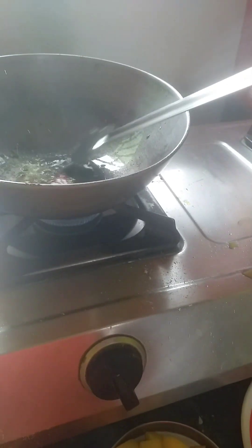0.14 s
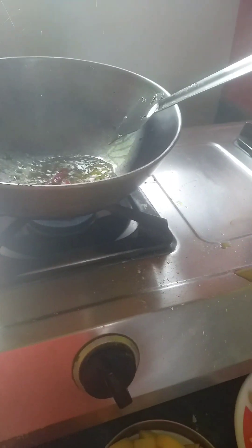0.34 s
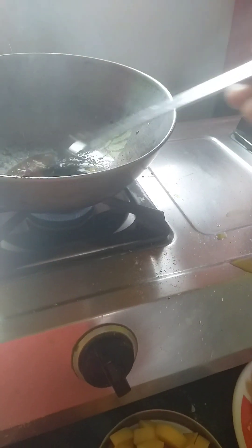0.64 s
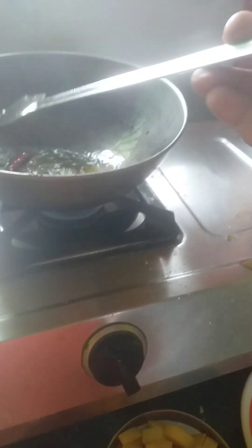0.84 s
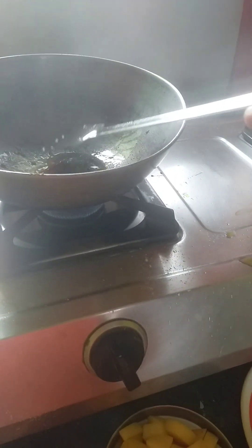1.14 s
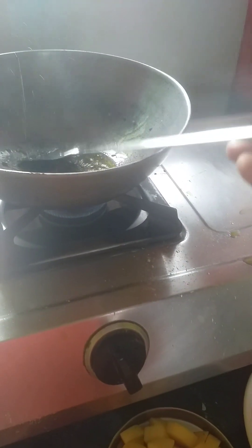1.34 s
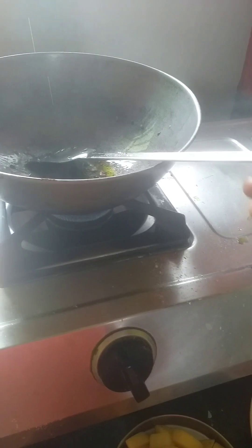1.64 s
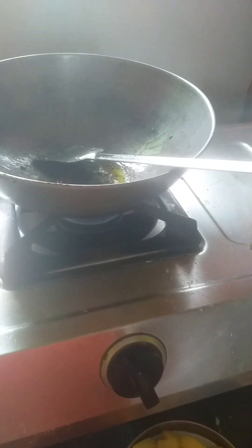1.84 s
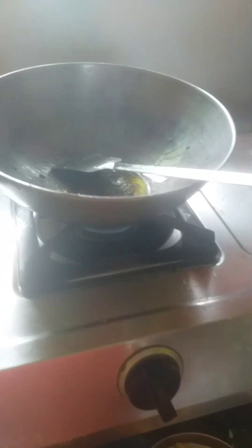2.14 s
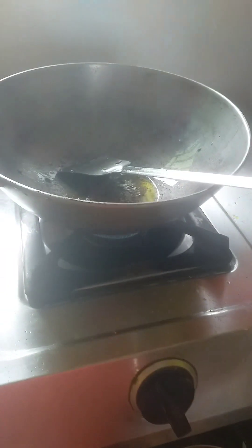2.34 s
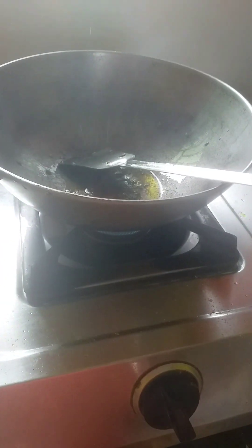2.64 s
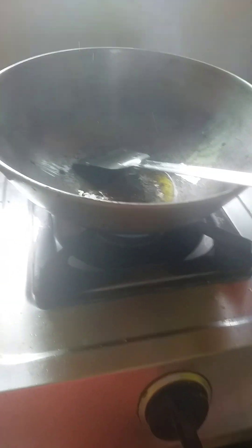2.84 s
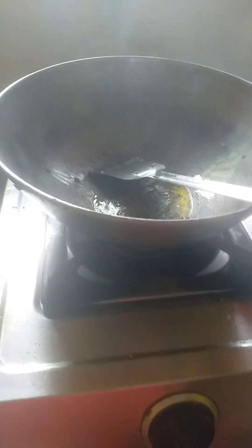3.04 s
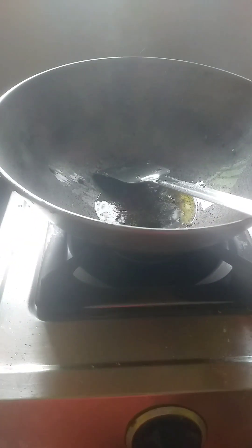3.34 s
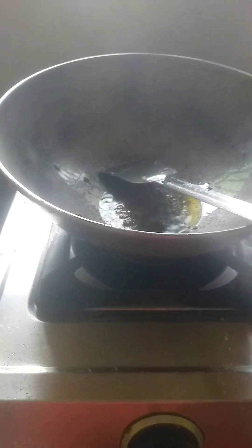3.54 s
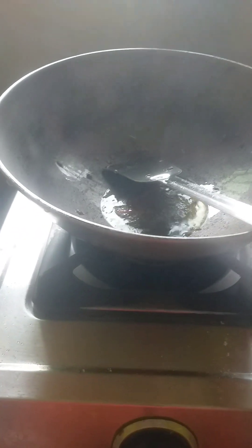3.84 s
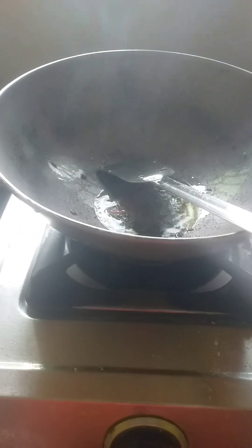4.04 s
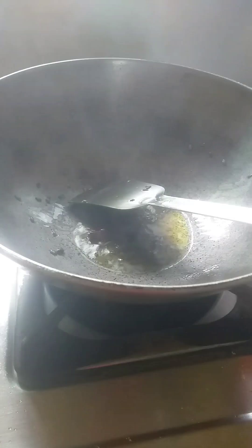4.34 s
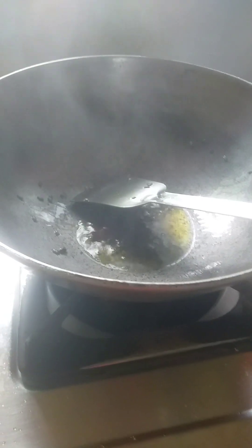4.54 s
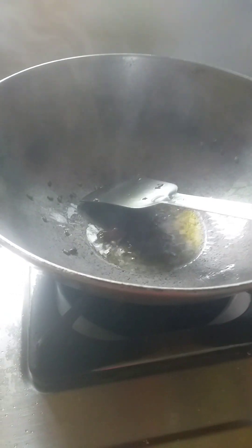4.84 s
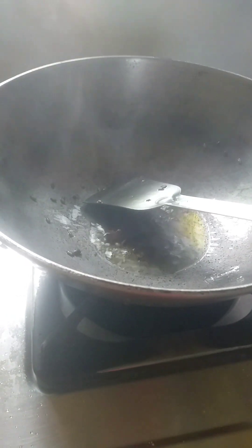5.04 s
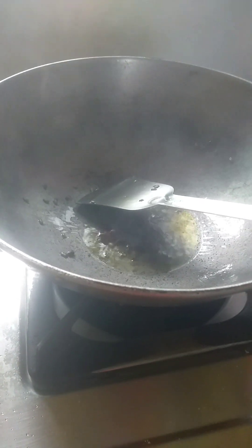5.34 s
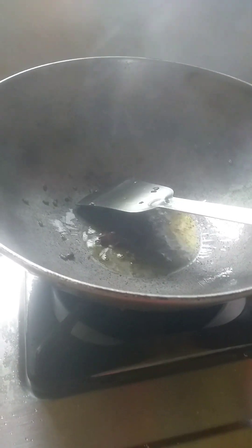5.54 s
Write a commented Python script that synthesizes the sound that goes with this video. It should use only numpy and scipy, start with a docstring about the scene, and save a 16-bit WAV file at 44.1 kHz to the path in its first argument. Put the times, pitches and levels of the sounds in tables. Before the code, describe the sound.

Seeds and dried chilli pop and spit rapidly in hot oil in a deep metal pan, thinning out to quiet fizz and burner hum.

```python
"""Bursting seeds and chilli pop in hot oil in a deep steel pan, close to a phone in a small hard kitchen. Each
pop layers a bubble's short ping, a thud, a crack and a spit of treble, thrown back by pan and walls. Noise
bands make the oil's fizz and the burner's roar; deep thuds under some pops, soft knocks and one faint tone sit
among them. Near the end the sound drops out for an instant; then come a faint creak, a dying ring and a few
weak pops over fizz and burner."""
import sys
import numpy as np
from scipy import signal
from scipy.fft import rfft, irfft
from scipy.io import wavfile
from scipy.ndimage import uniform_filter1d

SR = 44100
rng = np.random.default_rng(int(sys.argv[2]) if len(sys.argv) > 2 else 0)


def wav_record(signal):
    """Record a signal, one row per channel, as 16-bit PCM in the file named by sys.argv[1]."""
    frames = np.transpose(np.atleast_2d(signal))
    bounded = np.clip(frames, -1, 1)
    # unit amplitude maps onto the largest positive 16-bit level
    quanta = np.round(bounded * 32767).astype(np.int16)
    wavfile.write(sys.argv[1], SR, quanta)


N = 251370
DROPOUT_START_S, DROPOUT_END_S = 4.333, 4.346


def undb(db):
    """Decibels to amplitude."""
    return 10 ** (np.asarray(db) / 20)


def unit(x):
    """Scale to an RMS of 1."""
    return x / np.sqrt(np.mean(x ** 2))


def noise():
    """White noise as long as the scene."""
    return rng.standard_normal(N)


def band(x, hz, width):
    """Steep band-pass around hz."""
    edges = [max(hz - width / 2, 20), min(hz + width / 2, .45 * SR)]
    return signal.sosfilt(signal.butter(3, edges, "bandpass", fs=SR, output="sos"), x)


def click_band(hz, width):
    """A one-sample click heard through a band; energy 1."""
    click = (np.arange(1200) == 0) * 1.
    heard = band(click, hz, width)
    return heard / np.linalg.norm(heard)


def curve(table):
    """Columns of a timed table, one value a sample."""
    s, *columns = np.transpose(table)
    return [np.interp(np.arange(N) / SR, s, c) for c in columns]


def walk(rate):
    """Random levels held for 1 / rate seconds and slewed; spread near 1."""
    hold = int(SR / rate)
    steps = np.repeat(rng.standard_normal(N // hold + 1), hold)
    return 1.2 * uniform_filter1d(steps, hold)[:N]


def add(out, s, grain):
    """Mix a grain in at s seconds, cut at the end of the scene."""
    i = int(s * SR)
    out[i:i + len(grain)] += grain[:N - i]


# fizz of the oil; air is the top treble: start_s, level_db, air_level_db (against level_db)
OIL_FIZZ = [(0, -41, -21), (.7, -46.5, -10), (1.4, -44.5, -18), (2.4, -49, -13), (3.4, -59, -12),
            (4.3, -54, -9.5), (4.6, -63, -13), (4.85, -63, -12), (5.0, -63.5, -17), (5.7, -63.5, -16.5)]
# the 3.7-5 kHz hiss stays low, then swells once: start_s, gain_db
HISS_SWELL = [(4.5, -14), (4.85, -8), (5.0, 1), (5.3, 9), (5.58, 4), (5.7, -8)]
HISS_DB = -8  # hiss against the fizz level, before its swell


def fizz():
    """Countless tiny bubbles merge into hiss; its bands flicker a little."""
    level_db, air_db = curve(OIL_FIZZ)
    body = np.zeros(N)
    # pitch_hz, width_hz, level_db
    for hz, width, db in [(5400, 300, -11.5), (6850, 1770, -6), (7960, 830, -12), (3360, 3050, -17)]:
        body += undb(db + 1.0 * walk(13)) * unit(band(noise(), hz, width))
    hiss_db = HISS_DB + curve(HISS_SWELL)[0] + 0.74 * walk(32)
    hiss = unit(band(noise(), 4350, 1290)) * undb(hiss_db)
    air = unit(band(noise(), 12600, 7800)) * undb(air_db + 0.46 * walk(6.6))
    return undb(level_db) * (body + hiss + air)


# tone of the burner roar, shape only: pitch_hz, relative_level_db (per Hz)
BURNER_TONE = [(18, -69), (30, -5.5), (92, -2), (154, -5), (198, -4.5), (223, -16.5), (303, -5),
               (428, -16.5), (926, -20.5), (1060, -28.5), (1360, -20.5), (2040, -37), (3000, -22.5),
               (3900, -31), (6600, -120)]
# loudness of the roar: start_s, level_db
BURNER_LEVEL = [(0, -66.5), (1.0, -68), (1.7, -66), (2.3, -65), (3, -67.5), (4.3, -65), (4.7, -70.5),
                (5.7, -68.5)]


def burner():
    """Low roar of the gas flame and the kitchen's hum: noise shaped by a spectrum, wavering in level."""
    hz = np.maximum(np.arange(N // 2 + 1) * SR / N, 1)
    tone_hz, tone_db = np.transpose(BURNER_TONE)
    shape_db = np.interp(np.log(hz), np.log(tone_hz), tone_db)
    roar = irfft(rfft(noise()) * undb(shape_db), N)
    return unit(roar) * undb(curve(BURNER_LEVEL)[0] + 0.68 * walk(18))


def ping(hz, cycles, glide):
    """A bubble rings, dying over a few cycles, its pitch rising by any glide; energy 1."""
    turns = np.arange(int(7 * cycles / hz * SR)) * hz / SR
    tone = np.sin(2 * np.pi * turns * (1 + glide * turns / cycles))
    attack = 1 - np.exp(-(turns / 2.1) ** 2)
    y = tone * np.exp(-turns / cycles) * attack
    return y / np.linalg.norm(y)


# bands of a pop, in order thud, three of crack, spit: pitch_hz, width_hz
POP_BANDS = [(700, 645), (2350, 1215), (4000, 1840), (6600, 2520), (12600, 5100)]
# thud of every pop, fading as the oil calms: start_s, level_db (against the ping)
POP_THUD = [(0, -20), (1.5, -25.5), (3, -34.5), (4.5, -41)]
CRACK_FALL_DB = 21.5  # loss from one end of the brightness range to the other


def pops(rows):
    """A ping, a thud, the crack of the husk and a spit of treble for every bursting seed."""
    out = np.zeros(N)
    clicks = [click_band(hz, width) for hz, width in POP_BANDS]
    for s, ping_db, hz, crack_db, bright, spit_db in rows:
        add(out, s, undb(ping_db) * ping(hz, cycles=2.97, glide=0.0046))
        thud_db = np.interp(s, *np.transpose(POP_THUD))
        # the crack is loudest in the band nearest its brightness
        crack = crack_db - CRACK_FALL_DB * (np.arange(3) / 2 - bright) ** 2
        parts_db = [thud_db, *crack, spit_db]
        add(out, s, sum(undb(ping_db + db) * click for db, click in zip(parts_db, clicks)))
    return out


SMALL_POPS, SMALL_END_S = 160, 4.5
SMALL_DB, SMALL_FADE_DB_PER_S, SMALL_SPREAD_DB = -27.5, 6.5, 2.5


def small_pops():
    """Rows for the many little bursts between the loud ones, weaker as time goes on."""
    u = rng.random((SMALL_POPS, 5))
    s = SMALL_END_S * u[:, 0] ** 1.2
    ping_db = SMALL_DB - SMALL_FADE_DB_PER_S * s - SMALL_SPREAD_DB * np.log(u[:, 1])
    hz = 2500 * 2.6 ** u[:, 2]
    crack_db, bright, spit_db = 0 * s, u[:, 3], -2.5 - 12 * u[:, 4]
    return list(zip(s, ping_db, hz, crack_db, bright, spit_db))


def rings(modes, t):
    """Decaying modes after a blow at t = 0."""
    return sum(undb(db - 60 * t / t60) * np.sin(2 * np.pi * hz * t) for hz, db, t60 in modes)


# early echoes: delay_s (varied a little), level_db (before echo_db), smear_s
EARLY_ECHOES = [(.0062, 2, 0.00099), (.012, -4, 0.002), (0.017, -5, 0.0043)]
# decay of the room by band: pitch_hz, t60_s
ROOM_DECAY = [(700, 0.33), (1800, 0.25), (3000, 0.22), (5000, 0.25), (7500, 0.26), (13000, 0.22)]
# ringing modes of the pan: pitch_hz, level_db (against the tail), t60_s
PAN_MODES = [(764, -18, 0.19), (1735, -36, 0.04), (1860, -42, 0.34), (3480, -25, 0.097),
             (5830, -18.5, 0.34), (6650, -13, 0.144), (7180, -19, .2), (13300, -21.5, 0.145),
             (13300, -16, .2), (14450, -17.5, .13)]


def kitchen(x, tail_db, echo_db):
    """Direct sound and echoes smeared by the curved pan, its ring, then a tail that dies by band."""
    t = np.arange(SR // 2) / SR
    splits = [np.sqrt(a[0] * b[0]) for a, b in zip(ROOM_DECAY, ROOM_DECAY[1:])]
    edges = [0] + splits + [SR / 2]
    f = np.arange(len(t) // 2 + 1) * SR / len(t)
    spectrum = rfft(rng.standard_normal(len(t)))
    tail = np.zeros(len(t))
    for lo, hi, (_, t60) in zip(edges, edges[1:], ROOM_DECAY):
        tail += irfft(spectrum * (f >= lo) * (f < hi), len(t)) * undb(-60 * t / t60)
    onset = 1 - np.exp(-(t / 0.00089) ** 2)
    room = undb(tail_db) * (tail * onset + rings(PAN_MODES, t))
    direct = [(0, 0.0026, 0.00082)]  # delay_s, level_db, smear_s
    echoes = [(s, db + echo_db, smear) for s, db, smear in EARLY_ECHOES]
    for s, db, smear in direct + echoes:
        cluster = rng.standard_normal(600) * np.exp(-t[:600] / smear)
        delay = s * (1 + 0.026 * rng.standard_normal())
        add(room, delay, undb(db) * cluster / np.linalg.norm(cluster))
    return signal.fftconvolve(x, room)[:N]


# deep thuds that go with some pops: start_s, level_db (of the body)
DEEP_THUDS = [(.144, -35.5), (.201, -39.5), (.4322, -40), (.5594, -37.5), (.625, -28.5), (.7929, -38),
              (.902, -44), (.9347, -34), (.9681, -32), (1.342, -26), (1.3925, -26.5), (1.4276, -34),
              (2.4263, -42), (2.4893, -44), (2.5799, -41), (2.6075, -44.5), (2.729, -49), (2.8702, -45),
              (4.0057, -49), (4.2146, -48)]
THUD_BODY_HZ, THUD_EDGE_HZ = 767, 1500  # hollow body and brighter edge


def deep_thuds():
    """Deep thuds that go with some pops: a click in a body band and an edge band."""
    out = np.zeros(N)
    thump = click_band(THUD_BODY_HZ, 380) + undb(-3.5) * click_band(THUD_EDGE_HZ, 450)
    for s, db in DEEP_THUDS:
        add(out, s, undb(db) * thump)
    return out


# dull knocks on the stove top: start_s, level_db (before the mode levels)
STOVE_KNOCKS = [(0.26, -58), (0.955, -55.5), (1.071, -50.5), (1.34, -48.5), (1.401, -43.5), (1.537, -48.5),
                (2.297, -56.5), (2.683, -54), (2.88, -67), (3.625, -66)]
# modes of the stove top, varied at each knock: pitch_hz, level_db, t60_s
STOVE_MODES = [(162, -5.5, 0.24), (287, -8, 0.42), (369, -3.5, 0.15), (455, 6, 0.041)]


def knocks():
    """Soft blows ring the stove top, each exciting its modes a little differently."""
    out, t = np.zeros(N), np.arange(SR // 2) / SR
    chances = rng.standard_normal((len(STOVE_KNOCKS), len(STOVE_MODES)))
    soft_attack = 1 - np.exp(-t / 0.0026)
    for (s, db), chance in zip(STOVE_KNOCKS, chances):
        modes = [(hz, d + 1.6 * c, t60) for (hz, d, t60), c in zip(STOVE_MODES, chance)]
        add(out, s, undb(db) * rings(modes, t) * soft_attack)
    return out


HOOT_START_S, HOOT_LENGTH_S, HOOT_HZ, HOOT_DB = 2.24, .06, 620, -62


def hoot():
    """One faint, brief sine tone with rounded ends."""
    out, t = np.zeros(N), np.arange(int(HOOT_LENGTH_S * SR)) / SR
    envelope = np.sqrt(np.sin(np.pi * t / HOOT_LENGTH_S))
    add(out, HOOT_START_S, undb(HOOT_DB) * np.sin(2 * np.pi * HOOT_HZ * t) * envelope)
    return out


# faint ringing after the dropout: pitch_hz, level_db (before swell and decay), t60_s
LATE_RING = [(509, -70.5, 1.0), (2640, -54, 0.44), (3530, -49, .3)]
RING_SWELL_S = 0.049


def after_ring():
    """Rough noise bands that swell and die away once the sound is back."""
    t = np.maximum(np.arange(N) / SR - DROPOUT_END_S, 0)
    swell = 1 - np.exp(-(t / RING_SWELL_S) ** 2)
    out = np.zeros(N)
    for hz, db, t60 in LATE_RING:
        out += undb(db - 60 * t / t60) * swell * unit(band(noise(), hz, hz / 12))
    return out


# creak ticks: start_s, level_db (energy), pitch_hz
CREAK_TICKS = [(4.502, -37, 1740), (4.556, -38.5, 1600), (4.611, -23.5, 1620), (4.644, -24.5, 1600),
               (4.652, -26, 1340), (4.666, -41, 1630), (4.696, -31.5, 1325), (4.773, -36, 1630),
               (4.787, -30.5, 1610), (4.797, -36, 1350), (4.808, -37, 1364), (4.826, -35.5, 1590),
               (4.961, -40.5, 1570), (4.989, -42, 1490)]
FAINT_TICKS, FAINT_SPAN_S = 20, (4.51, 4.98)
FAINT_DB, FAINT_HZ = -49.5, 1600  # middle of their random spread


def creak():
    """Stick-slip ticks of something rubbing: short dull rings, a weaker rasp around them."""
    out = np.zeros(N)
    faint = []
    for u, v, w in rng.random((FAINT_TICKS, 3)):
        s = np.interp(u, (0, 1), FAINT_SPAN_S)
        faint.append((s, FAINT_DB + 6 * (v - .5), FAINT_HZ * (1 + 0.13 * (w - .5))))
    for s, db, hz in CREAK_TICKS + faint:
        add(out, s, undb(db) * ping(hz, cycles=6.7, glide=0.))
    # the rasp follows the loudness of the ticks
    loudness = np.sqrt(np.abs(uniform_filter1d(out ** 2, 1800)))
    rasp = unit(band(noise(), 1490, 440)) + 0.78 * unit(band(noise(), 8100, 9900))
    return out + 0.8 * loudness * rasp


# loud pops; bright runs 0 dull - 1 bright, crack and spit are against the ping:
# start_s, ping_level_db (energy), ping_pitch_hz, crack_level_db, bright, spit_level_db
LOUD_POPS = [(.0043, -23.5, 7600, -4.5, 0.28, -3.5), (.033, -19.5, 2190, -4.5, 0.7, -23.5),
             (.0683, -17, 3230, -11.5, 0.58, -23), (.0866, -19, 2520, -4, 0.61, -5.5),
             (.144, -27, 3760, 8.5, 0.59, 6), (.1896, -27, 3800, -2, 0.56, -1),
             (.201, -14.5, 2170, 0.5, 0.018, -5.5), (.268, -23.5, 7400, 5, .6, -2.5),
             (.31, -19, 3760, 0.5, .6, -2), (.3459, -26.5, 6560, 7.5, 1, 3.5),
             (.4024, -18, 3480, -9, 1, -26), (.4322, -12, 3050, 7, 0.52, -5.5),
             (.4653, -14.5, 6760, -4, 0.011, -35), (.4962, -27, 2200, -3, 0.99, -22),
             (.5594, -17, 6330, -3, 0.68, -8.5), (.572, -13, 3280, -6, 0.62, -15),
             (.5893, -16.5, 3020, -0.5, 0.26, -22), (.625, -18, 4420, 3, 0.64, -6.5),
             (.7116, -13, 3080, 2.5, .55, -11.5), (.7354, -26.5, 3580, 7.5, 0.78, 2),
             (.7929, -26.5, 7300, 10, 0.61, 3), (.8243, -21.5, 5070, -2, 0.84, -8),
             (.8684, -17, 2350, -0.5, 0.53, -12), (.902, -14, 2900, -5.5, 1, -16),
             (.9347, -17, 2320, 2.5, 0.1, -13), (.9681, -15, 5800, -4, 0.53, -12.5),
             (1.0025, -21, 3200, -1.5, 0.73, -25), (1.041, -20, 4580, 2.5, 0.59, -26),
             (1.062, -22.5, 4280, -10, 0, -20), (1.1189, -20.5, 2340, -2, 0.25, -15),
             (1.1547, -18, 3580, -17, 1, -10), (1.182, -15, 7430, -0.5, 0.44, -1),
             (1.2032, -13, 3650, -0.5, .5, -8), (1.25, -12.5, 2300, -2, 0.42, -18),
             (1.2975, -12.5, 3860, -2.5, 0.42, -15), (1.325, -17.5, 3100, -0.5, 0.42, -21),
             (1.342, -8.5, 6510, 2.5, 0.64, 0), (1.3925, -21, 5400, 1, 0.35, -3),
             (1.4276, -8.5, 1820, -8, 0.52, -22), (1.433, -11.5, 3480, -11, .7, -7),
             (1.5147, -18, 4220, 2.5, 0.14, -17), (1.5779, -12, 3820, -2, 0.56, -17.5),
             (1.5956, -11.5, 3050, -6.5, .6, -24), (1.6692, -18.5, 5380, -3.5, 1, -18),
             (1.7379, -18.5, 2970, -12, 0.4, -13.5), (1.766, -20.5, 3850, -9, 1, -26),
             (1.7928, -16.5, 2880, -35, 0.32, -12.5), (1.8049, -13.5, 2470, -2, 0.6, -21),
             (1.8574, -17, 2710, -1, 0.57, -23), (1.8946, -27, 4200, 3, 0.49, -20),
             (1.9067, -15.5, 5400, 1, 0.74, -18), (1.938, -14.5, 2320, 5, 0.37, -11.5),
             (1.993, -51.5, 1930, -5, 0.78, 24), (2.0773, -29, 7180, 9.5, 0.55, -0.5),
             (2.107, -19.5, 2870, -1.5, 0.48, -28), (2.1288, -19.5, 3950, 0.5, 0.69, -5),
             (2.1827, -21.5, 7000, -4, .5, -28), (2.225, -19, 5640, -9, 0.8, -25),
             (2.2591, -20, 3000, -8, 0.73, -17), (2.303, -29.5, 6940, 4.5, 1, 0),
             (2.3517, -20, 4330, 4.5, 0.82, -22), (2.3627, -12.5, 2170, -6, 0.35, -22),
             (2.404, -16.5, 3820, -4.5, 0, -19), (2.4263, -15.5, 2780, 3.5, 0.54, -10.5),
             (2.4893, -19, 3300, -3, 0.5, -22), (2.525, -24, 2450, 3.5, 0.6, -14),
             (2.5799, -18.5, 7100, 5.5, 0.52, -3), (2.6075, -25.5, 4700, 13, 0.34, -33),
             (2.6965, -28.5, 4260, 6.5, 0.82, -1), (2.729, -30.5, 3780, 8, 0.52, -2),
             (2.8012, -30, 3860, 4, 0.47, -10), (2.8369, -22.5, 5570, 2.5, 0.54, -6.5),
             (2.856, -15, 2500, -1, 0.28, -27), (2.8702, -25.5, 2160, 10.5, 0, -10),
             (2.9895, -32, 2920, 2, 0.65, -24), (3.05, -17, 4170, -4, 0.84, -11.5),
             (3.0915, -24.5, 5770, 2.5, 0.76, -1.5), (3.1261, -14.5, 2750, -2.5, 0.14, -16),
             (3.1412, -32, 2680, 11, 0.65, -4), (3.1769, -9, 3250, -5, 0.89, -17.5),
             (3.2533, -24, 2860, 2.5, .6, -10), (3.2862, -25.5, 2650, -1.5, 0.72, -8),
             (3.326, -25, 6100, -1, 1, -14), (3.3457, -30, 4000, 3.5, 0.7, -1.5),
             (3.4639, -18.5, 4200, -2.5, 0.79, -12), (3.4939, -16.5, 4460, -4.5, 0.87, -17),
             (3.505, -14, 3160, -25, 1, -23), (3.551, -26, 2480, 2.5, 0.75, -23),
             (3.605, -28, 2950, -1.5, 0.58, -13), (3.6315, -16.5, 2350, -8, 0.62, -29),
             (3.67, -15.5, 4440, -15, .8, -23), (3.7195, -15, 7640, 2, 0.78, 2),
             (3.8005, -26, 3830, 4, 0.44, -42), (3.9027, -13.5, 2140, -6, 0.014, -32),
             (3.9633, -28.5, 4600, 2.5, 1, -29), (4.0057, -20.5, 5840, -0.5, 0.22, -11.5),
             (4.0436, -36.5, 4500, 4, 0.56, -5), (4.099, -34.5, 6440, 6, .45, -16),
             (4.2146, -13.5, 2260, -1, 0.89, -15.5), (4.2426, -26, 2760, 5.5, 0.42, -4),
             (4.3205, -23.5, 5600, -9, 0.95, -12), (4.3955, -29.5, 7500, 3, 0.54, -4),
             (4.4564, -37.5, 7100, 4, 0.89, 0), (4.5003, -30, 5980, -0.5, 1, 2),
             (4.9888, -41, 7800, -2, 1, -10), (5.0241, -48, 7490, -2, 0.8, 1.5)]
SPOTS = 6  # places in the pan where seeds burst


def scene():
    """Pops in the pan over fizz and burner, with one dropout through everything."""
    t = np.arange(N) / SR
    rows = LOUD_POPS + small_pops()
    early = [row for row in rows if row[0] < DROPOUT_START_S]
    late = [row for row in rows if row[0] > DROPOUT_START_S]
    # each spot in the pan has its own paths to the phone
    pan = sum(kitchen(pops(early[k::SPOTS]), tail_db=-20.5, echo_db=-1.5) for k in range(SPOTS))
    pan = pan + kitchen(deep_thuds(), tail_db=-17, echo_db=0)  # the deep thuds ring on longer, with a stronger tail
    # the dropout also takes the ringing of the earlier pops; later pops are drier
    pan = pan * (t < DROPOUT_START_S) + kitchen(pops(late), tail_db=-26, echo_db=-3.5)
    fall, rise = (DROPOUT_START_S - t) / 0.00027, (t - DROPOUT_END_S) / 0.0028
    gate = np.clip(np.maximum(fall, rise), .05, 1)
    layers = pan + knocks() + creak() + after_ring() + hoot() + fizz() + burner()
    return (layers * gate)[None]


def record(dry):
    """The phone drops the deepest bass and cuts the top."""
    dry = signal.sosfilt(signal.butter(4, 57, "highpass", fs=SR, output="sos"), dry)
    return signal.sosfilt(signal.ellip(10, .2, 70, 16000, fs=SR, output="sos"), dry)


dry = scene()
out = record(dry)
wav_record(out)
```